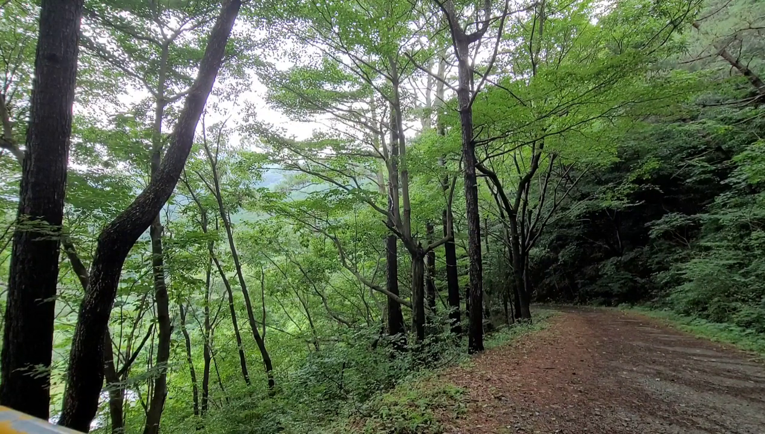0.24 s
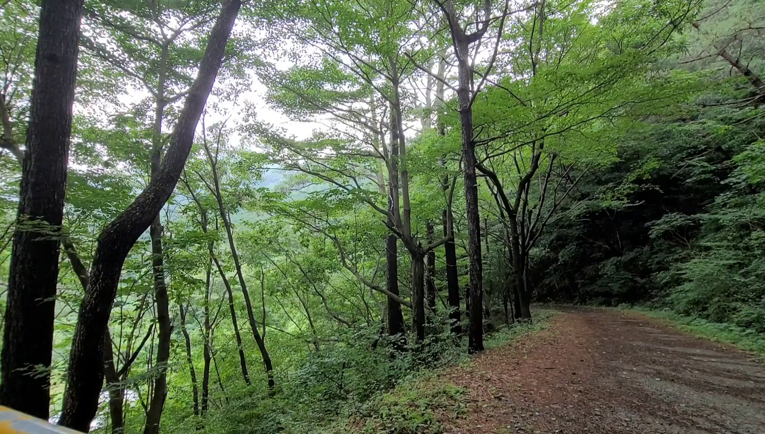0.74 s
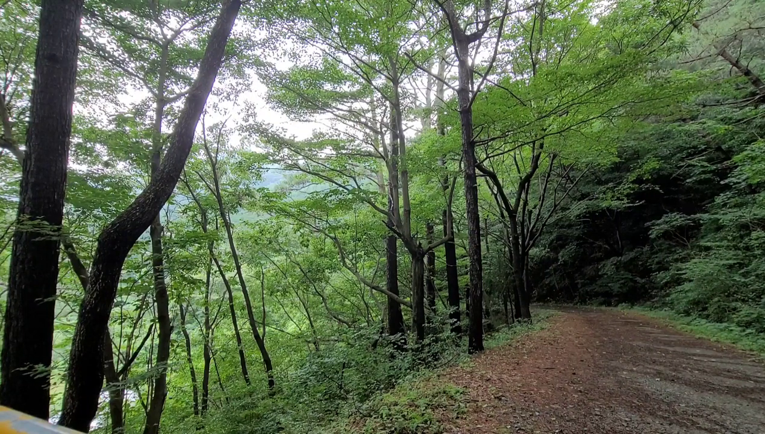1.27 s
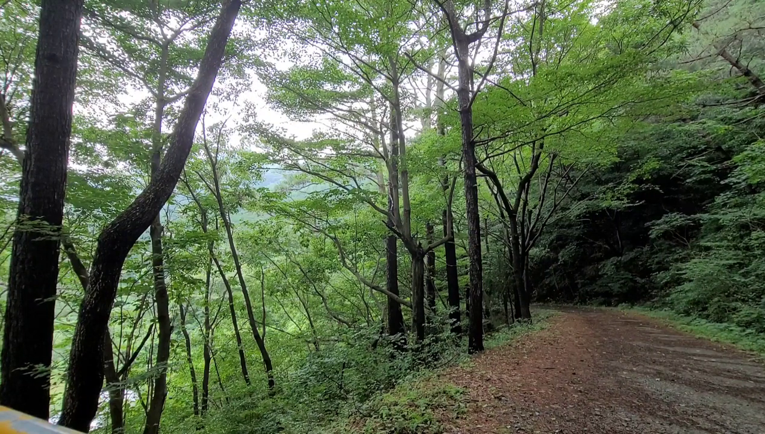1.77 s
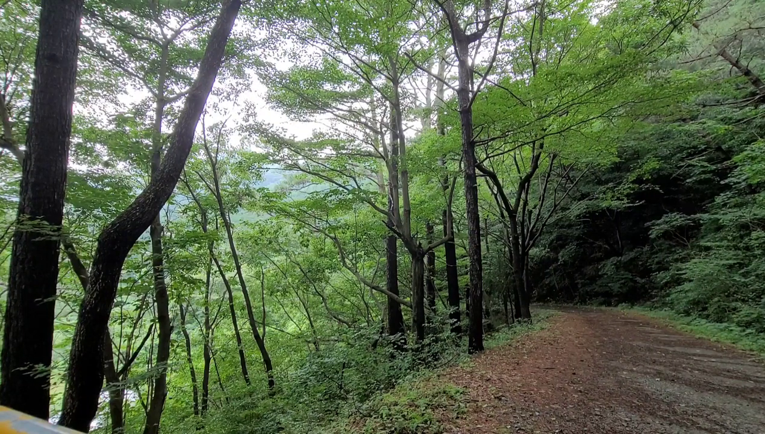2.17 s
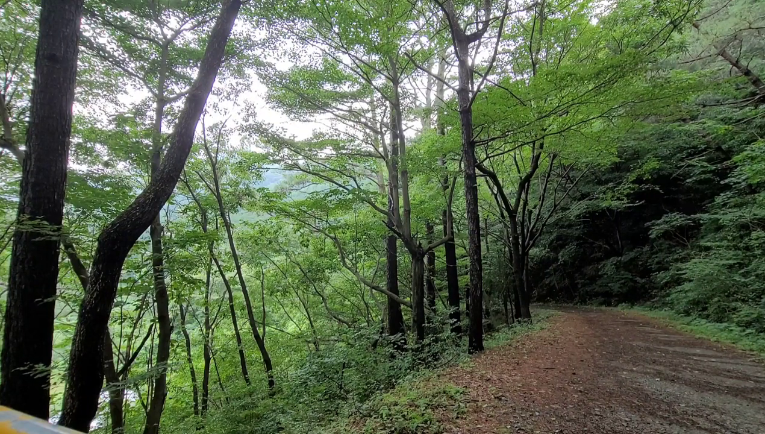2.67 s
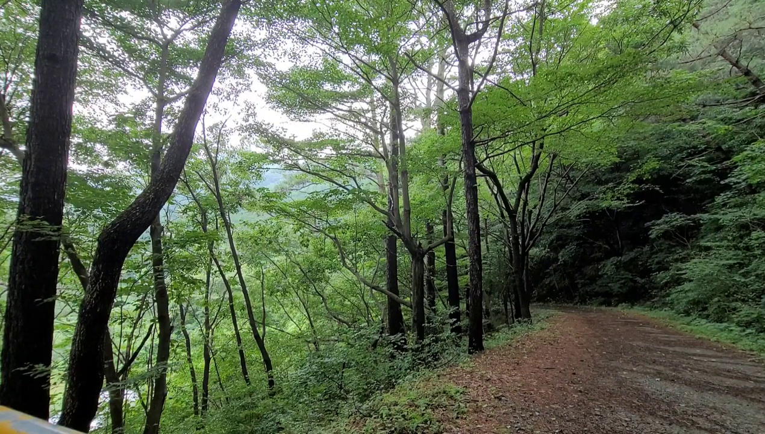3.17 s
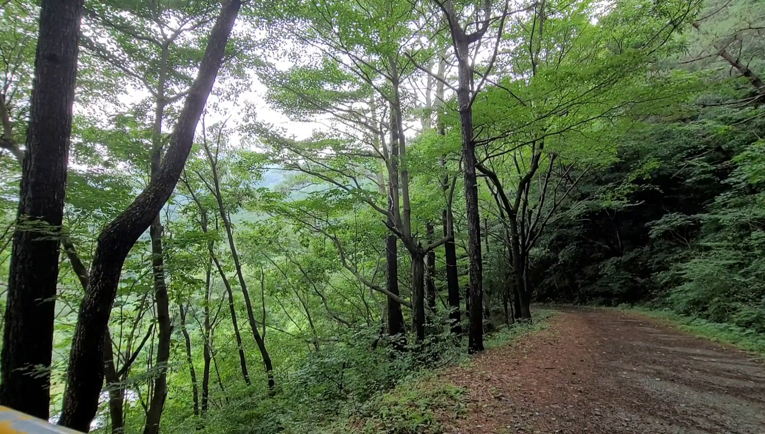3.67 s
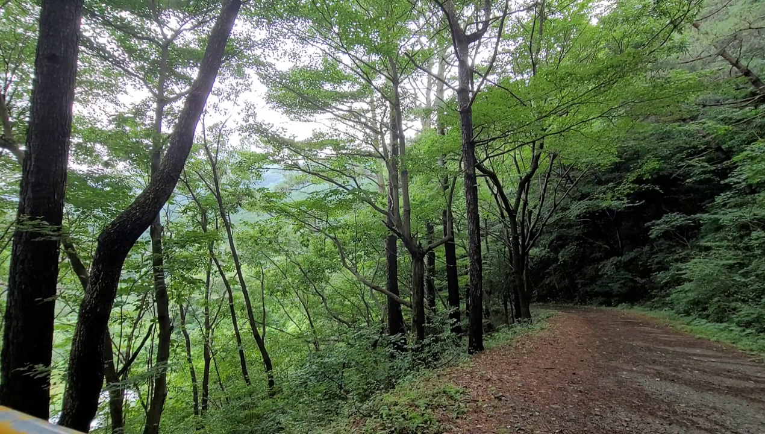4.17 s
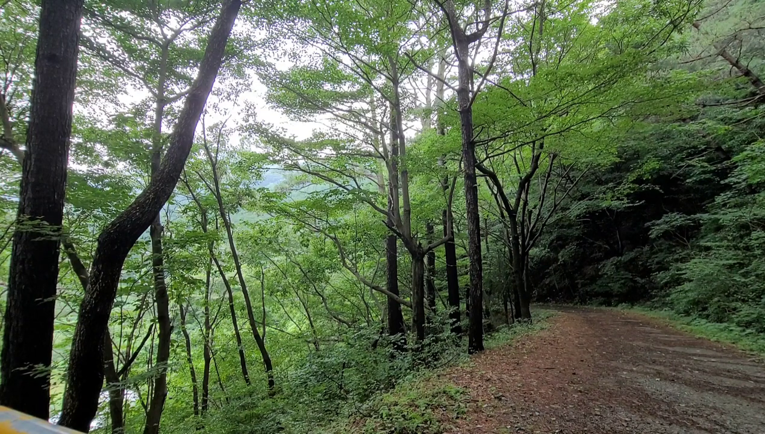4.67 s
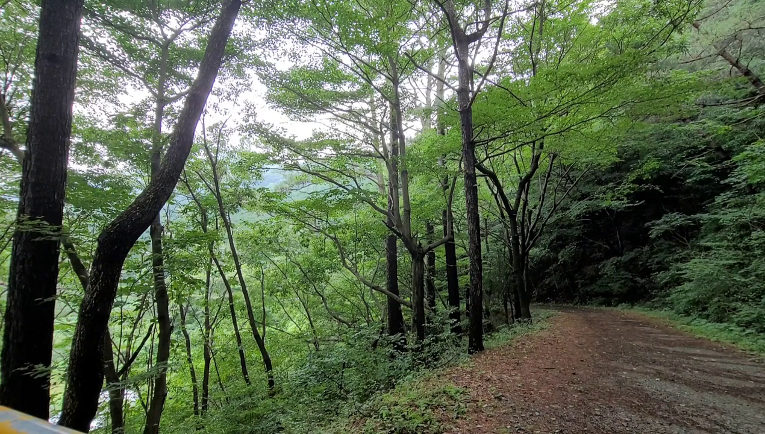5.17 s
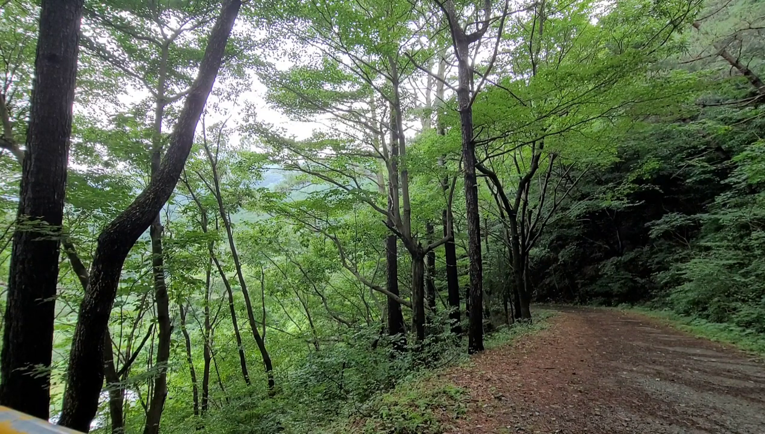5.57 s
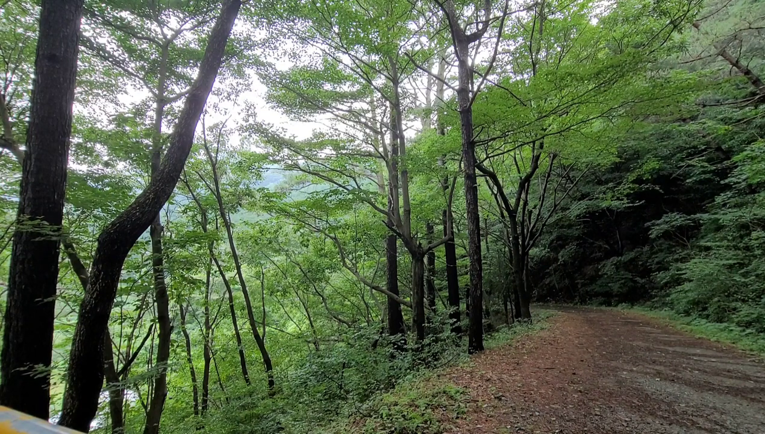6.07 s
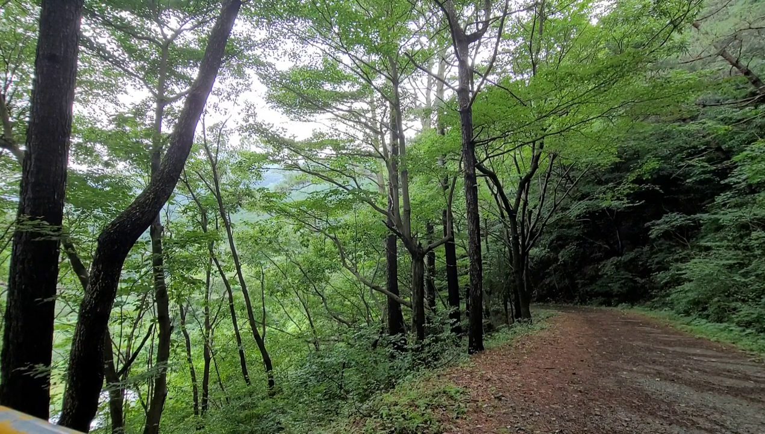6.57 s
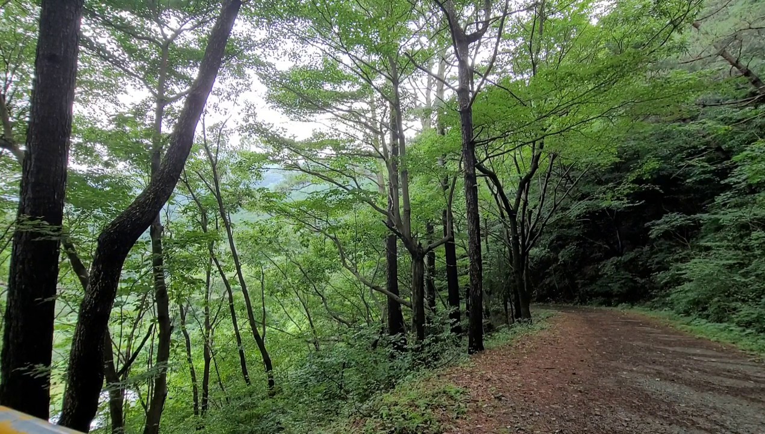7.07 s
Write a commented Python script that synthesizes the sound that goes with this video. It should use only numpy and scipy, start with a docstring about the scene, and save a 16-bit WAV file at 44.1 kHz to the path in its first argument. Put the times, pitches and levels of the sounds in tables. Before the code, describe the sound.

A constant wall of distant cicada noise fills the wooded slope. In front, a single male repeats a metallic buzz that climbs, cuts off, chirps and croaks, six swells in all, with soft chattering chirps between, denser after the fourth. Neighbours answer loosely from farther away. Very soft low wind; stereo outdoor pickup with short woodland reverberation.

```python
"""Cicadas in a mountain forest

A near male repeats a low lead-in buzz, a shrill swell, a short chirp and a low croak; neighbours swell and
croak farther off, over the blurred chorus of the slope, a faint breeze and one faint thin tone. Shrill songs
are trains of tymbal clicks, croaks are sums of resonant lines, chorus and breeze are shaped noise.
Trunks scatter the songs, the ground echoes the shrill ones; two close microphone ports hear it with a lag."""
import sys
import numpy as np
from scipy import signal
from scipy.fft import rfft, irfft, next_fast_len
from scipy.io import wavfile
from scipy.ndimage import uniform_filter1d, map_coordinates

SR = 44100
rng = np.random.default_rng(int(sys.argv[2]) if len(sys.argv) > 2 else 0)


def unload_audio(sound):
    """Save the sound as a 16-bit wav file, at the path given as the first command line argument."""
    columns = np.transpose(np.atleast_2d(sound))
    # keep every value between -1 and 1, then stretch to whole-number steps
    steps = np.round(np.clip(columns, -1, 1) * 32767)
    wavfile.write(sys.argv[1], SR, steps.astype(np.int16))


N = 323694


def amp(db):
    """Decibels to a linear gain."""
    return 10 ** (np.asarray(db) / 20)


def unit(x):
    """x scaled to rms 1."""
    return x / np.sqrt(np.mean(x ** 2) + 1e-20)


def along(points, hz):
    """Value at hz from (Hz, value) points on a log axis."""
    f, v = np.transpose(points)
    return np.interp(np.log(hz + 1), np.log(f + 1), v)


def curves(rows, x):
    """Each column after the first, read where the first column is x."""
    knots, *cols = np.transpose(rows)
    return [np.interp(x, knots, c) for c in cols]


def wobble(rate, size=N):
    """A smooth random curve, rate knots a second."""
    knots = rng.standard_normal(int(size * rate / SR) + 4)
    return map_coordinates(knots, [np.arange(size) * rate / SR])


def span(start, end):
    """Sample times from start to end."""
    return np.arange(round(start * SR), round(end * SR)) / SR


def filtered(x, response):
    """x times a complex response of frequency."""
    m = next_fast_len(N + SR // 4)
    return irfft(rfft(x, m) * response(np.fft.rfftfreq(m, 1 / SR)), m)[..., :N]


# Likeness of diffuse sound at the two ports: pitch_hz, correlation (1 = identical)
PORT_LIKENESS = [(30, 0.45), (100, 0.76), (350, 0.59), (1000, 0.59), (1800, 0.66), (2500, 0.043),
                 (4000, 0.41), (6000, 0.055), (15000, 0.047)]


def rush(spectrum, patchy_db):
    """Diffuse noise of rms 1, partly shared by the ports, with patches of random gain."""
    z = signal.stft(rng.standard_normal((2, N)), nperseg=512)[2]
    patches = rng.standard_normal(z.shape[1:])
    patches = uniform_filter1d(uniform_filter1d(patches, 5, 0), 12, 1)
    pair = signal.istft(z * amp(patchy_db * unit(patches)), nperseg=512)[1][:, :N]

    def coloured(hz):
        turn = np.arccos(np.clip(along(PORT_LIKENESS, hz), -1, 1)) / 2
        return amp(along(spectrum, hz)) * [np.cos(turn), np.sin(turn)]

    mid, side = filtered(pair, coloured)
    return unit(np.array([mid + side, mid - side]))


def tymbal(t, rate, db, rib_hz, ribs_db, ring, jitter, scatter_db, dull_db=0):
    """Each muscle pulse buckles the ribs in a row: a short burst with partials on the rib click rate."""
    beats = np.cumsum(rate * np.ones(len(t))) / SR
    luck = rng.standard_normal((int(beats[-1]), 3 + len(ribs_db)))
    start = np.interp(np.arange(len(luck)) + .5, beats, t) + jitter * luck[:, 0]
    index = np.ceil(start * SR).astype(int)[:, None] + np.arange(256)
    age = index / SR - start[:, None]
    hz = np.interp(start, t, rib_hz * np.ones(len(t))) * (1 + 0.011 * luck[:, 1])
    dull_db = np.interp(start, t, dull_db * np.ones(len(t)))[:, None]
    clicks = 0
    for k, partial_db in enumerate(ribs_db, 1):
        # dulling tilts the partials around the fourth
        gain = amp(partial_db - dull_db * (k - 4.0) + 1.1 * luck[:, 2 + k, None])
        # the body smears each click, so the partials do not peak together
        smear = 0.65 * k * k
        clicks = clicks + gain * np.sin(2 * np.pi * k * hz[:, None] * age + smear)
    shape = (age / ring * np.exp(1 - age / ring)) ** 2
    size = amp(np.interp(start, t, db) + scatter_db * luck[:, 2])
    bursts = size[:, None] * shape * clicks
    keep = (index >= 0) & (index < N)
    return np.bincount(index[keep], bursts[keep], N)


# Colour of the air noise: pitch_hz, relative_db
BREEZE_COLOUR = [(12, -35), (20, -12), (43, -16), (59, -11.5), (140, -2.5), (383, -1), (561, 0),
                 (776, -1.5), (994, -7), (1630, -7), (1900, -1.5), (2470, -46), (4180, -120)]
# Gusts in the bass rumble, before a random wobble: time_s, level_db
GUSTS = [(0, -74), (2.2, -71.5), (3.4, -71.5), (4.3, -67.5), (5.1, -73.5), (6.4, -68), (7.34, -73.5)]


def breeze():
    """A soft rush of air as shaped noise, with gusts in the bass."""
    gust_db, = curves(GUSTS, np.arange(N) / SR)
    bass_colour = [(20, -22.0), (60, 3), (110, -5.5), (160, -47), (300, -120)]  # pitch_hz, relative_db
    gusts = amp(gust_db + 0.69 * wobble(6.6)) * rush(bass_colour, patchy_db=2.0)
    return gusts + amp(-64) * rush(BREEZE_COLOUR, patchy_db=2.5)


# Course of the thin tone: time_s, pitch_hz, level_db
TONE_COURSE = [(1.12, 616, -78), (1.18, 650, -60), (1.274, 664, -61), (1.33, 670, -83)]


def tone():
    """A brief faint thin tone near 660 Hz, of no known source: a sine that glides in pitch and level."""
    t = np.arange(N) / SR
    hz, db = curves(TONE_COURSE, t)
    sounding = (t > TONE_COURSE[0][0]) & (t < TONE_COURSE[-1][0])
    return sounding * amp(db) * np.sin(2 * np.pi * np.cumsum(hz) / SR)


# Colour of the far shrill songs: pitch_hz, relative_db
SHRILL_COLOUR = [(2290, -25), (3900, -2.5), (4200, -3), (5080, 4), (6190, -1), (7460, 0.5), (8210, 2),
                 (9500, -3.5), (10300, -2.5), (11400, -3), (12400, -7.5), (13800, -12), (14300, -28),
                 (14700, -19), (15000, -52)]
# Colour of the far croaking: pitch_hz, relative_db
CROAKING_COLOUR = [(880, -32.5), (1500, -38), (2080, -24), (2150, -22.5), (2460, -6), (2780, -0.5),
                   (3100, -4), (3510, 0.5), (4300, -10), (5590, -20), (9460, -120)]
# base level, lift around each near swell top or croak start, width of that lift
SHRILL_DB, SHRILL_LIFT_DB, SHRILL_LIFT_S = -45, 2.5, 0.19
CROAKING_DB, CROAKING_LIFT_DB, CROAKING_LIFT_S = -48, 1.5, 0.41
RASP_HZ, RASP_DB = 321, 2.5  # centre of the pulse rate still heard in the blur, its depth


def chorus():
    """Males too far to tell apart blur into noise bands; the slope keeps loosely in step with the near male."""
    t = np.arange(N) / SR

    def lift(times, width):
        return sum(np.exp(-((t - s) / width) ** 2) for s in times)

    def rasp_db():
        return RASP_DB * np.sin(2 * np.pi * np.cumsum(RASP_HZ + 30 * wobble(8)) / SR)

    shrill_db = SHRILL_DB + SHRILL_LIFT_DB * lift([row[1] for row in NEAR_SWELLS], SHRILL_LIFT_S)
    croak_db = CROAKING_DB + CROAKING_LIFT_DB * lift([row[0] for row in NEAR_CROAKS], CROAKING_LIFT_S)
    shrill_gain = amp(shrill_db + rasp_db() + 0.35 * wobble(9.3))
    shrill = shrill_gain * rush(SHRILL_COLOUR, patchy_db=2.0)
    croak_gain = amp(croak_db + rasp_db() + 0.22 * wobble(8.4))
    return shrill + croak_gain * rush(CROAKING_COLOUR, patchy_db=2.0)


# Swells of the high and the middle male, one list each; levels precede partial gains, wobble and distance:
# top_s, rise_s, fall_s, level_db
NEIGHBOUR_SWELLS = [
    [(0.01, .1, 0.55, -44), (1.2, 0.14, 0.44, -56), (2.0, 0.55, 0.52, -37), (2.64, 0.27, 0.97, -46.5),
     (4.05, 0.83, 0.71, -40.5), (4.56, 0.15, 0.039, -41), (5.97, 0.34, 0.41, -37.5), (7.2, 0.12, 0.33, -59)],
    [(0.01, .1, 0.91, -42), (2.13, 0.091, 0.37, -34.5), (3.33, 1, 0.25, -37.5), (4.55, 0.45, 0.26, -34.5),
     (5.68, 0.55, 0.48, -37), (6.25, 0.1, 0.21, -44), (7.3, 0.44, .2, -40.5)],
]
# Resting level of the high and the middle male between swells: level_db
REST_LEVELS = [-58, -52.5]
# Rib click partials 1-5 of both males: relative_db
FAR_PARTIALS = [-17.5, -5, 3.5, 1.5, -4]


def swelling_db(rows, rest_db):
    """Level that ramps up to each top and back to rest; the loudest swell wins."""
    t = np.arange(N) / SR
    ramps = [np.interp(t, [top - rise, top, top + fall], [rest_db, db, rest_db])
             for top, rise, fall, db in rows]
    return np.max(ramps, axis=0)


def neighbours():
    """Two more males buzz their tymbals, each with his own swells."""
    t = np.arange(N) / SR
    high_db, middle_db = [swelling_db(*male) for male in zip(NEIGHBOUR_SWELLS, REST_LEVELS)]
    high = tymbal(t, 310 + 25 * wobble(2.8), high_db + 3.8 * wobble(6.4), 2870 + 25 * wobble(2.9),
                  FAR_PARTIALS, ring=0.00057, jitter=.00005, scatter_db=0.5)
    middle = tymbal(t, 290 + 25 * wobble(3), middle_db + 2.4 * wobble(10), 2720 + 25 * wobble(2.76),
                    FAR_PARTIALS, ring=0.00064, jitter=.00005, scatter_db=2.0)
    return high + middle


# Level of the near male's low buzz, before partial gains, wobble and mixing: time_s, level_db
LEAD_IN_LEVEL = [(0, -51), (.47, -45.5), (.98, -51.5), (1.98, -48), (3.33, -47), (3.82, -52.5), (4.29, -45),
                 (4.6, -59), (5.0, -49), (5.76, -46), (5.97, -57), (6.25, -51), (7.34, -45.5)]
# Rib click partials 1-5 of that buzz, the second strongest: relative_db
LEAD_IN_PARTIALS = [-16.5, 1.5, -13, -23, -26]


def lead_in():
    """The near male's low lead-in buzz: soft tymbal pulses whose rib clicks glide up into his swells."""
    t = np.arange(N) / SR
    level_db, = curves(LEAD_IN_LEVEL, t)
    rib_hz = 2430 + sum(150 * np.exp(-((t - row[1]) / 0.23) ** 2) for row in NEAR_SWELLS)
    return tymbal(t, 270 + 8 * wobble(4), level_db + 1.6 * wobble(12), rib_hz + 15 * wobble(3.1),
                  LEAD_IN_PARTIALS, ring=0.0012, jitter=.00003, scatter_db=0.5)


# Neighbours' croaks, levels before distance:
# start_s, top_s, end_s, starting pair_rate_hz, onset_level_db, peak_level_db
FAR_CROAKS = [(.37, .425, .5, 179.5, -56, -48), (.48, .56, .66, 168, -52, -49),
              (1.51, 1.566, 1.63, 178.8, -54, -49), (1.79, 1.89, 2.0, 168, -54, -48),
              (3.43, 3.52, 3.6, 168, -55, -49), (4.35, 4.43, 4.6, 178, -57, -51),
              (6.37, 6.43, 6.6, 178.5, -57, -50)]
# Near male's croaks: start_s, top_s, end_s, starting pair_rate_hz, onset_level_db, peak_level_db
NEAR_CROAKS = [(1.002, 1.112, 1.23, 171.8, -38, -26), (2.343, 2.455, 2.56, 172.5, -38, -26),
               (3.686, 3.8, 3.9, 171.1, -37, -27), (4.734, 4.822, 4.98, 173.2, -34, -26),
               (5.981, 6.072, 6.24, 170.6, -28.5, -27)]
# Course of a croak, its top at progress 0.58; raise_hz is added to the upper resonance:
# progress (0-1), odd_line_gain (0-1), roughness (0-1), upper_resonance_hz, lower_resonance_hz
CROAK_COURSE = [(0, 1, .3, 2950, 2000), (.1, .85, .25, 3170, 2200), (.2, .5, .2, 3300, 2430),
                (.35, .25, .2, 3400, 2430), (.6, .4, .28, 3490, 2420), (.75, .5, .4, 3470, 2420),
                (1, .7, .6, 3350, 2400)]
# Brief dips in the croaking: centre_s, depth_db, half_width_s
CROAK_DIPS = [(1.142, -9, .006), (1.162, -5, 0.011), (4.791, -7, .006), (4.81, -6, .004), (4.828, -9, .002),
              (4.847, -10, .003), (4.868, -17, 0.012), (4.888, -7, .002), (4.917, -10, .009),
              (6.119, -15, 0.011), (6.168, -8, 0.008), (2.484, -13, .004)]
CROAK_ATTACK_S, CROAK_HOLD_S = 0.036, 0.04  # onset time, time spent at the peak
CROAK_SILENT_DB = -24  # level at the start under the peak
CROAK_FALL_BEND = 1.5  # above 1 the fall starts gently


def croaks(rows, upper_width_hz, lower_width_hz, raise_hz, sag_hz_per_s, end_db,
           lower_db, lower_sag_db, stutter_db):
    """Left and right tymbal alternate into the hollow abdomen; an uneven pair adds lines halfway.
    Each line is a sine weighted by two moving resonances, as the pulses slow."""
    out = np.zeros(N)
    for start, top, end, start_hz, onset_db, peak_db in rows:
        t = span(start, end)
        knots = [start, min(start + CROAK_ATTACK_S, top), top, top + CROAK_HOLD_S, end]
        rate = start_hz - sag_hz_per_s * np.clip(t - knots[1], 0, .13)
        fall_db = end_db * np.interp(t, knots[3:], [0, 1]) ** CROAK_FALL_BEND
        upper_rise = [CROAK_SILENT_DB, onset_db - peak_db, 0, 0, 0]
        upper_level_db = peak_db + np.interp(t, knots, upper_rise) + fall_db
        sagged_db = lower_db - lower_sag_db
        lower_rise = [CROAK_SILENT_DB, lower_db, sagged_db, sagged_db, lower_db - 1.0]
        lower_level_db = peak_db + np.interp(t, knots, lower_rise) + 0.57 * fall_db

        progress = np.interp(t, [start, top, end], [0, .58, 1])
        uneven, rough, upper_hz, lower_hz = curves(CROAK_COURSE, progress)
        phase = 2 * np.pi * np.cumsum(rate) / SR + 0.07 * rough * wobble(250, len(t))
        stutter = amp(stutter_db * wobble(69.7, len(t)))  # the whole voice flickers
        for k in range(10, 27):
            upper_offset = (k * rate - upper_hz - raise_hz) / upper_width_hz
            upper = amp(upper_level_db) / (1 + upper_offset ** 2) ** 1.3
            lower = amp(lower_level_db) / (1 + ((k * rate - lower_hz) / lower_width_hz) ** 4)
            waver = amp(7 * rough * wobble(60, len(t)))  # each line flickers by itself
            pair_gain = uneven if k % 2 else 1
            line = (upper + lower) * waver * pair_gain * np.sin(k * phase + .4 * k * k)
            out[round(t[0] * SR):][:len(t)] += stutter * line
    t = np.arange(N) / SR
    return out * amp(sum(db * np.exp(-((t - s) / width) ** 4) for s, db, width in CROAK_DIPS))


# Chirps and softer chatter, levels before partial gains and echoes:
# start_s, level_db, rib_click_hz, fade_s (time to fall 6 dB)
CHIRP_CALLS = [(0.24, -52, 2920, 0.033), (0.926, -34.5, 2740, 0.019), (1.477, -46, 2650, .038),
               (1.536, -46.5, 2720, 0.063), (2.2684, -34, 2870, 0.018), (2.602, -51, 2800, 0.06),
               (2.909, -49, 2840, .03), (3.073, -48, 2800, 0.049), (3.143, -45, 2770, .027),
               (3.613, -33, 2810, 0.016), (3.913, -44, 2830, 0.021), (3.988, -48, 2880, 0.019),
               (4.062, -48, 2780, 0.038), (4.325, -46, 2800, 0.029), (4.541, -45, 2920, 0.026),
               (4.652, -36, 2840, 0.024), (4.794, -43, 2850, 0.013), (4.878, -44.5, 2830, 0.015),
               (4.957, -49, 2850, 0.019), (5.045, -44, 2870, 0.028), (5.125, -48, 2850, 0.024),
               (5.223, -45, 2810, 0.021), (5.301, -49, 2830, 0.027), (5.407, -44, 2870, 0.013),
               (5.49, -44, 2850, 0.017), (5.902, -35.5, 2660, 0.015), (5.955, -52, 2830, 0.02),
               (6.052, -45, 2780, 0.018), (6.128, -47, 2830, 0.038), (6.415, -44.5, 2800, 0.016),
               (7.281, -36.5, 2840, 0.016)]
# Rib click partials 1-5 in chirps, before dulling: relative_db
CHIRP_PARTIALS = [-13, -4, 5, 6, 1]


def chirps():
    """Short bursts of fast tymbal pulses that start hard and fade."""
    out = np.zeros(N)
    for s, db, rib_hz, length in CHIRP_CALLS:
        age = np.arange(round(1.8 * length * SR)) / SR
        fade_db = -6 * (age / length) ** 4.1
        out += tymbal(s + age, 335, db + fade_db, rib_hz, CHIRP_PARTIALS,
                      ring=0.00043, jitter=.00006, scatter_db=-0.7, dull_db=3)
    return out


# Near male's swells, levels before partial gains and echoes: start_s, top_s, fall_s, level_db
NEAR_SWELLS = [(.55, 0.834, 0.033, -32), (1.859, 2.14, 0.085, -32), (3.171, 3.509, 0.068, -32.5),
               (4.172, 4.544, 0.066, -31.5), (5.498, 5.812, .045, -31.5), (6.906, 7.181, 0.054, -32.5)]
# Rib click partials 1-5 of the near male at full effort: relative_db
NEAR_PARTIALS = [-16, -4.5, 1, 1, -8.5]
# depth of the climb, how early it flattens, depth of the fall
SWELL_RISE_DB, SWELL_BEND, SWELL_FALL_DB = 13.5, 2.3, 17


def swells():
    """The long shrill syllable: pulses quicken throughout, and the ribs click faster and brighter with effort."""
    out = np.zeros(N)
    for start, top, fall, peak_db in NEAR_SWELLS:
        t = span(start, top + fall)
        climb_db = SWELL_RISE_DB * np.clip((top - t) / (top - start), 0, 1) ** SWELL_BEND
        under_db = climb_db + SWELL_FALL_DB * np.clip((t - top) / fall, 0, 1)
        rate = np.interp(t, t[[0, -1]], [262, 320])
        out += tymbal(t, rate, peak_db - under_db, 2704 - 11 * under_db, NEAR_PARTIALS,
                      ring=0.00077, jitter=.00002, scatter_db=1.0, dull_db=0.17 * under_db)
    return out


GROUND_S, GROUND_DB = .00629, -10  # delay and level of the bounce


def grounded(x):
    """The song and its bounce: the soft ground returns a late, inverted copy."""
    return filtered(x, lambda hz: 1 - amp(GROUND_DB) * np.exp(-2j * np.pi * hz * GROUND_S))


# Decay of the scatter between the trunks: pitch_hz, t60_s
FOREST_DECAY = [(2000, 0.26), (5000, 0.18), (12000, 0.037)]


def forest(x):
    """Scatter off trunks, different at each port: noise in which each frequency dies at its own speed."""
    hz, t, z = signal.stft(rng.standard_normal((2, SR // 2)), SR, nperseg=256)
    decay = amp(-60 * t / along(FOREST_DECAY, hz)[:, None])
    tail = signal.istft(z * decay, SR, nperseg=256)[1]
    late = np.pad(x, (150, 0))[None]  # delayed by 150 samples
    return signal.fftconvolve(late, tail / np.linalg.norm(tail[0]), axes=1)[:, :N]


def scene():
    """Songs heard directly and off the trunks, over the chorus, the breeze and the thin tone."""
    shrill = grounded(swells() + chirps())
    croak = croaks(NEAR_CROAKS, upper_width_hz=260, lower_width_hz=240, raise_hz=0, sag_hz_per_s=58,
                   end_db=-30, lower_db=-18, lower_sag_db=3, stutter_db=1.2)
    far_croak = croaks(FAR_CROAKS, upper_width_hz=220, lower_width_hz=300, raise_hz=30, sag_hz_per_s=26.0,
                       end_db=-17, lower_db=-14, lower_sag_db=0, stutter_db=2.5)
    softer = grounded(neighbours() + lead_in()) + far_croak
    direct = shrill + croak + amp(-7.5) * softer + tone()
    scattered = forest(amp(-2.5) * shrill + amp(-12) * croak + softer)
    return direct + scattered + chorus() + breeze()


# Phase by which the left port leads the right: pitch_hz, lead_rad
PORT_LEAD = [(0, 0), (520, 2.6), (1550, 3.4), (2150, 2.5), (3450, -2.6), (4820, -5.1), (6890, -9.9),
             (8010, -10.2), (10900, -18.7), (12600, -23.0), (13000, -26.5), (13400, -23.6), (13800, -27.7),
             (15200, -28.4)]
# Level of the left port over the right: pitch_hz, difference_db
PORT_BALANCE = [(60, 0), (110, -2.5), (200, -2), (380, 0.0), (700, 1), (1290, -1), (2380, 1), (4400, -1.5),
                (8120, 1.5), (15000, -2)]
TOP_HZ = 15600  # band limit


def record(dry):
    """The ports differ in lag and colour, the top fades; nothing is kept above the band limit."""
    lead_hz, lead = np.transpose(PORT_LEAD)
    side = np.array([[.5], [-.5]])  # each port takes half the difference

    def response(hz):
        colour = amp(side * along(PORT_BALANCE, hz))
        lag = np.exp(1j * side * np.interp(hz, lead_hz, lead))
        fade = amp(-12 * np.clip((hz - 13900) / 1100, 0, 2))
        return colour * lag * fade * (hz < TOP_HZ)

    return filtered(dry, response)


dry = scene()
out = record(dry)
unload_audio(out)
```